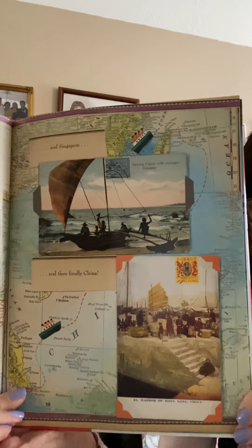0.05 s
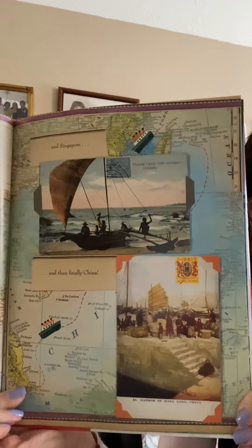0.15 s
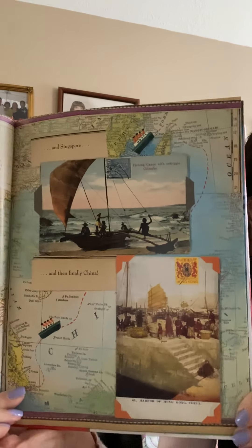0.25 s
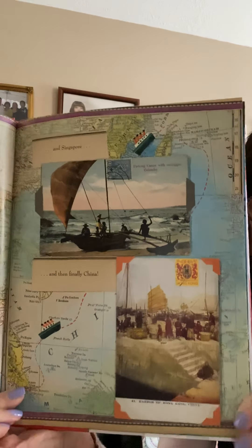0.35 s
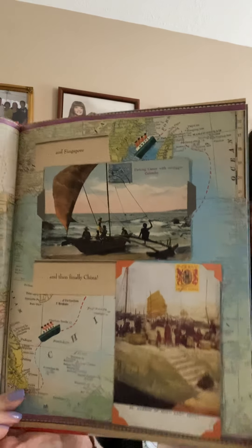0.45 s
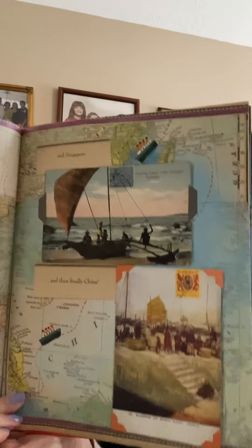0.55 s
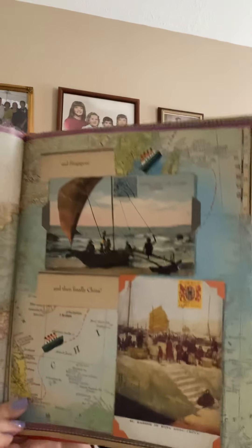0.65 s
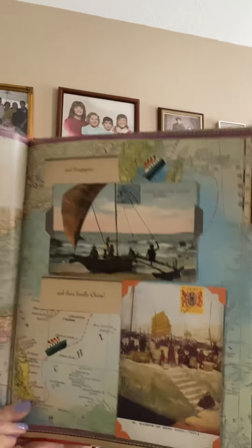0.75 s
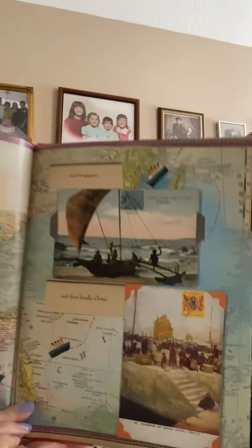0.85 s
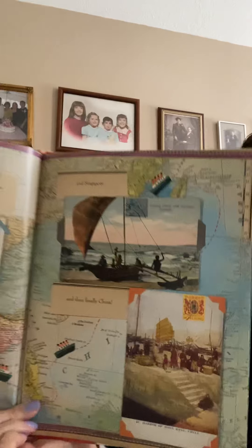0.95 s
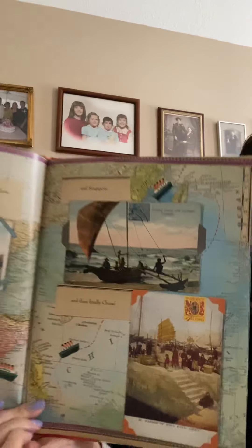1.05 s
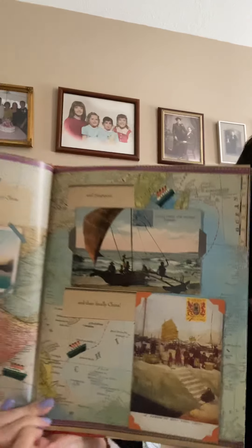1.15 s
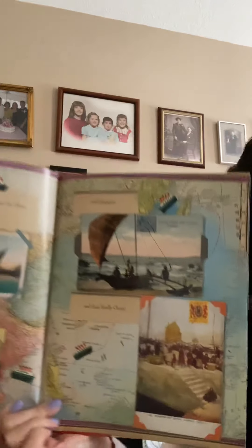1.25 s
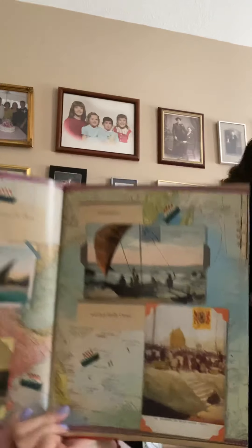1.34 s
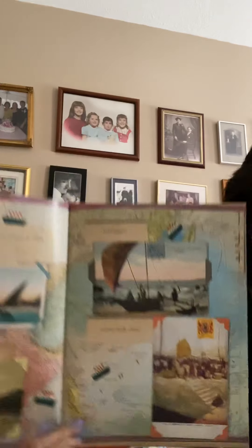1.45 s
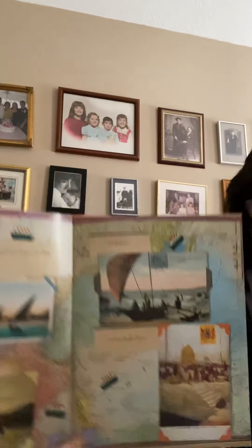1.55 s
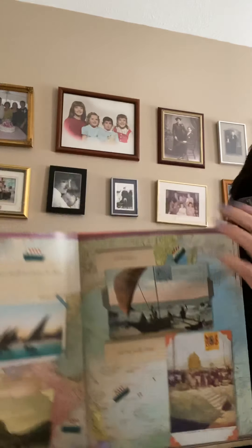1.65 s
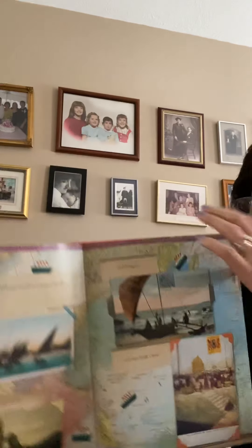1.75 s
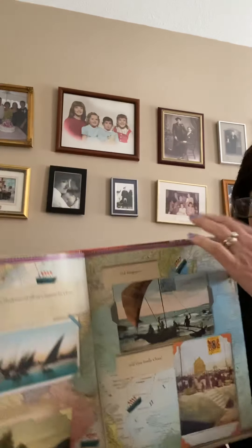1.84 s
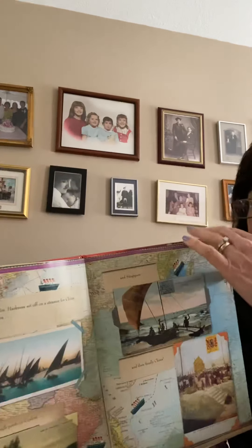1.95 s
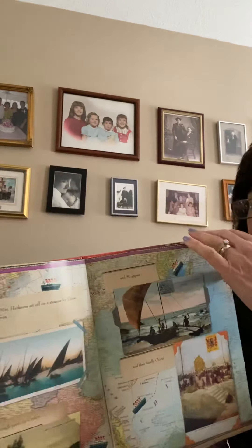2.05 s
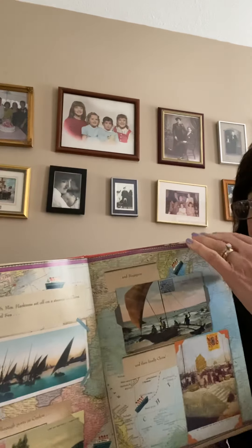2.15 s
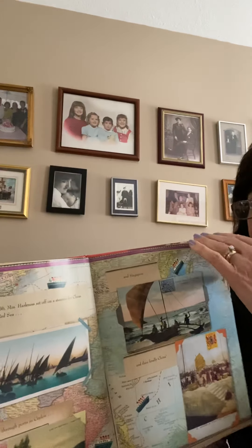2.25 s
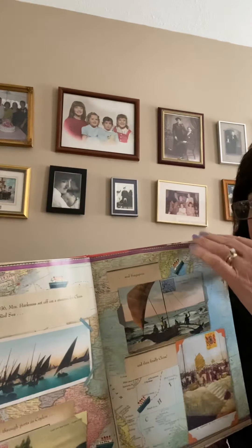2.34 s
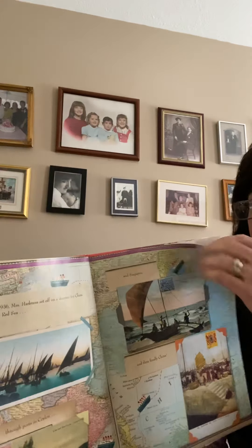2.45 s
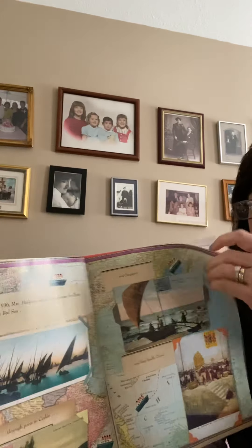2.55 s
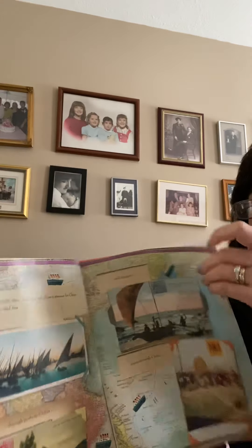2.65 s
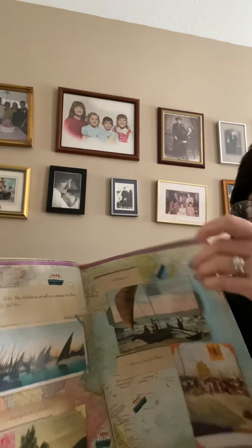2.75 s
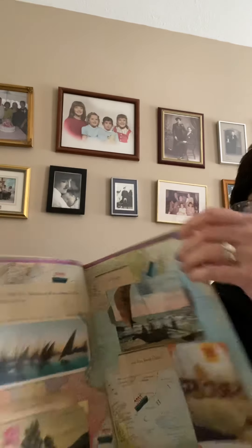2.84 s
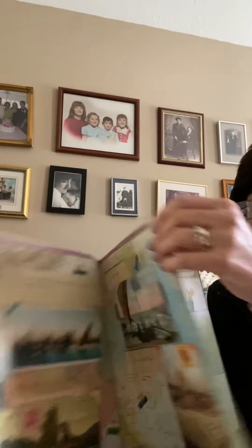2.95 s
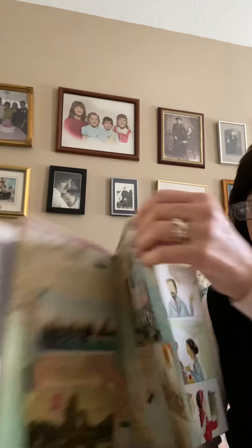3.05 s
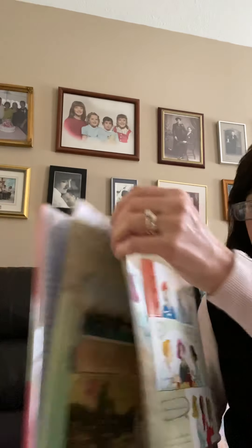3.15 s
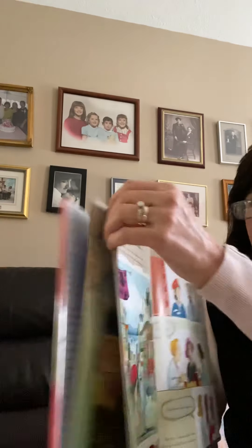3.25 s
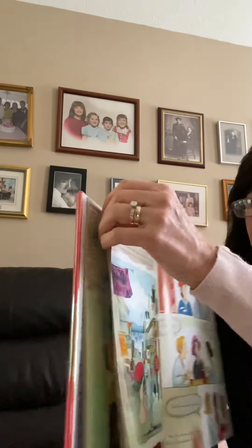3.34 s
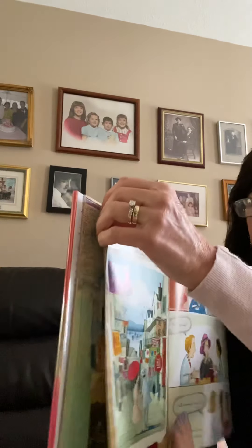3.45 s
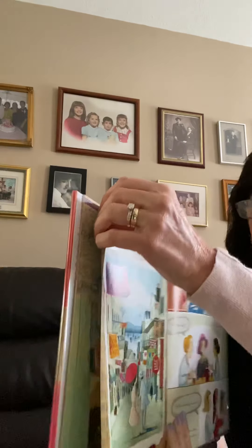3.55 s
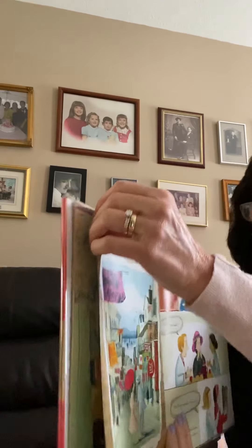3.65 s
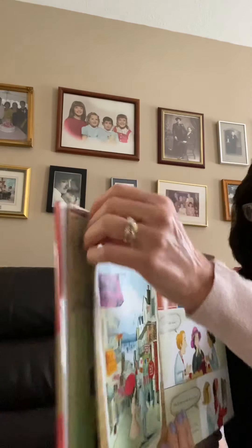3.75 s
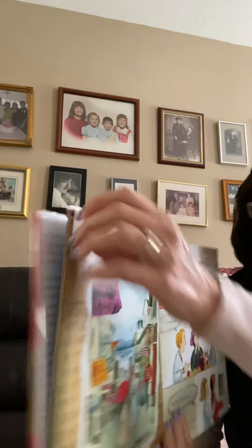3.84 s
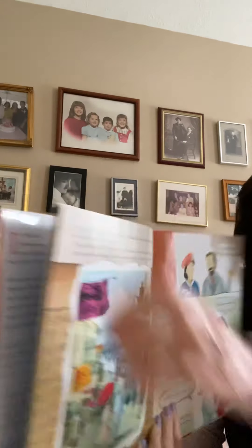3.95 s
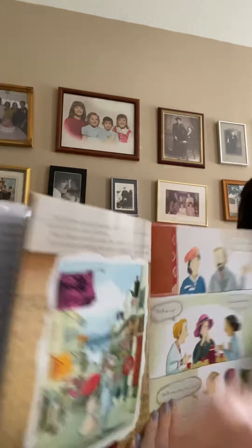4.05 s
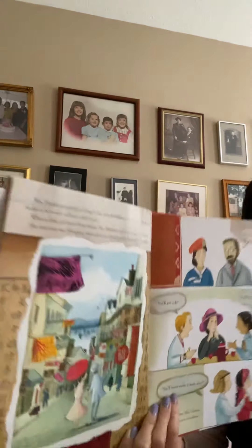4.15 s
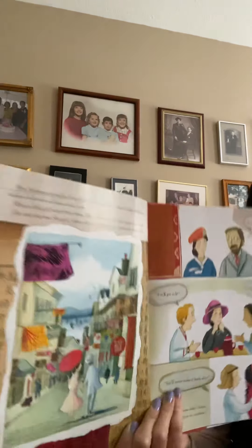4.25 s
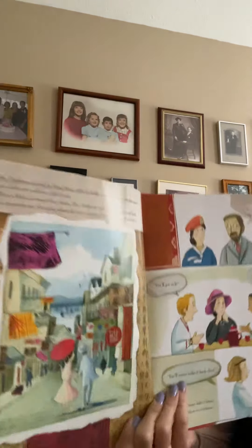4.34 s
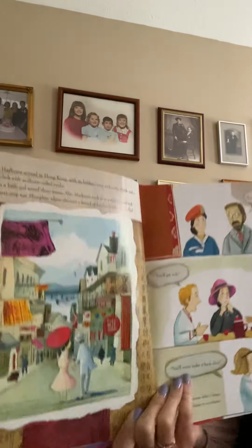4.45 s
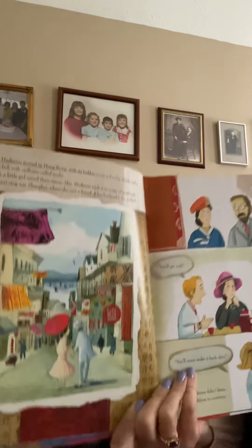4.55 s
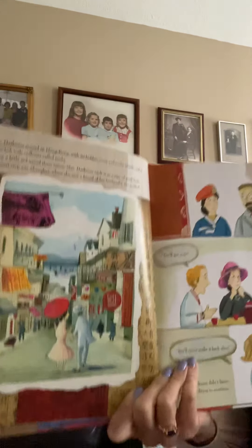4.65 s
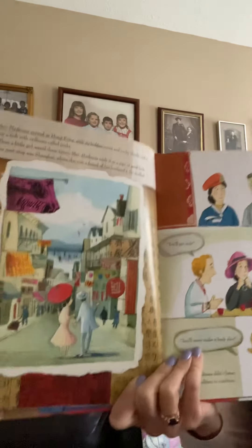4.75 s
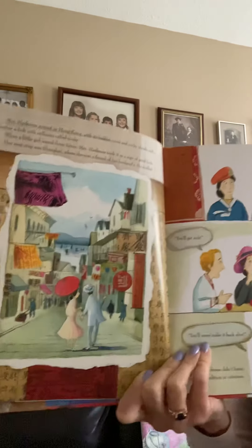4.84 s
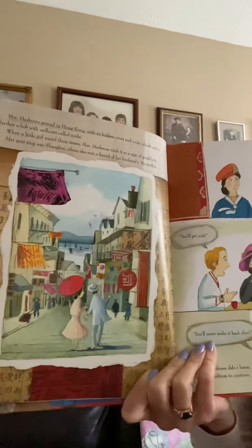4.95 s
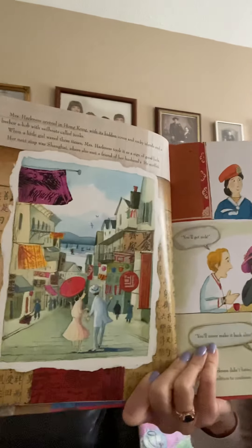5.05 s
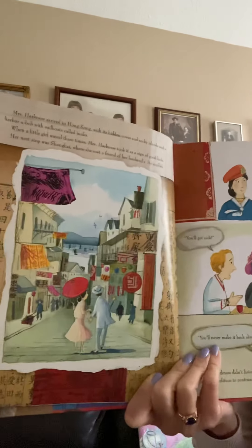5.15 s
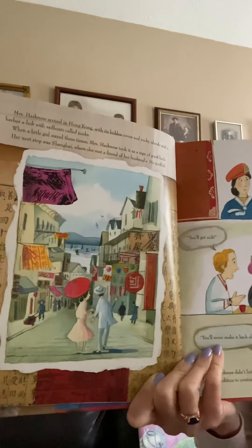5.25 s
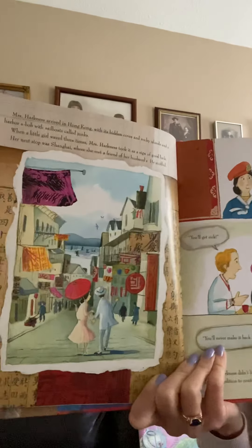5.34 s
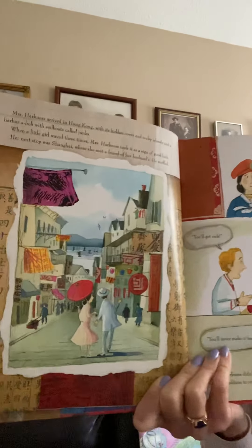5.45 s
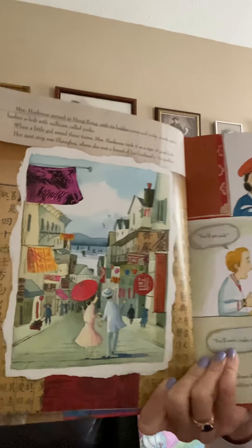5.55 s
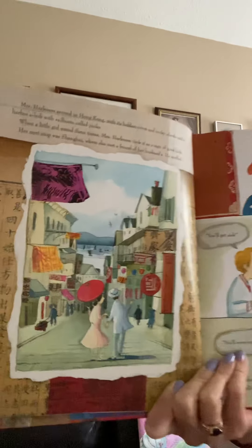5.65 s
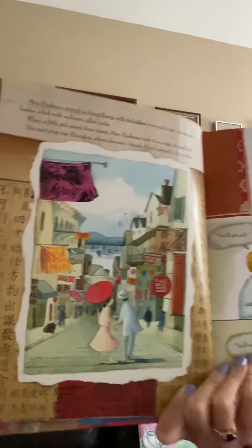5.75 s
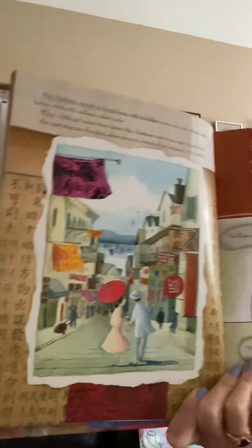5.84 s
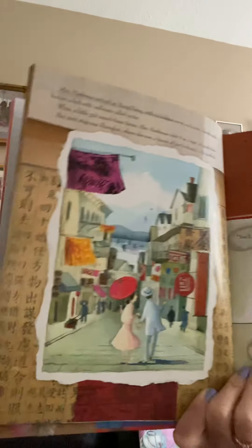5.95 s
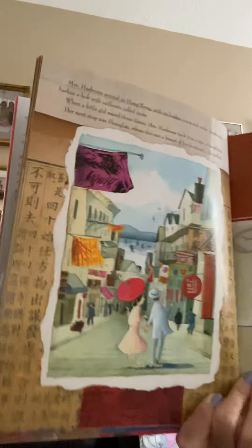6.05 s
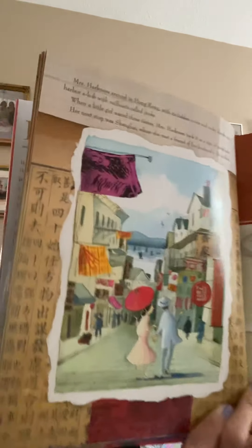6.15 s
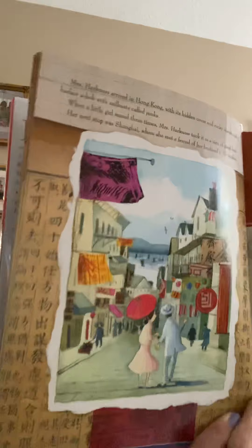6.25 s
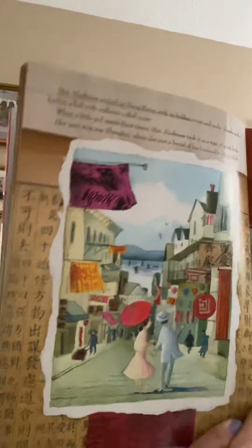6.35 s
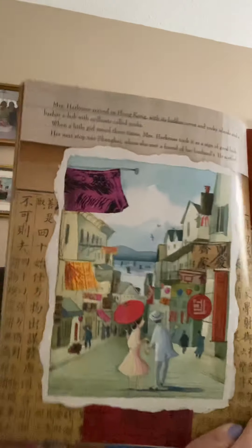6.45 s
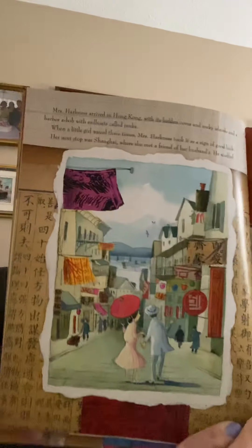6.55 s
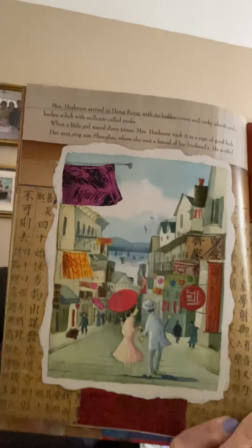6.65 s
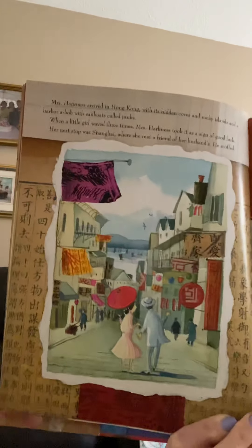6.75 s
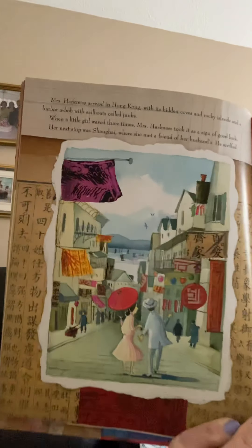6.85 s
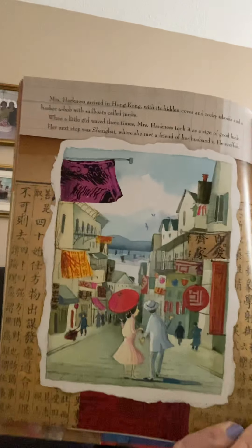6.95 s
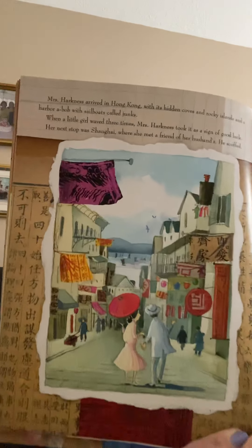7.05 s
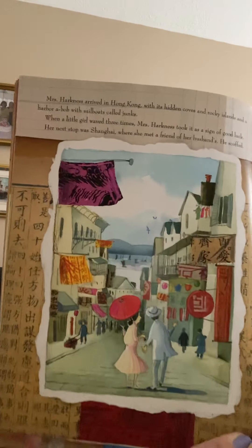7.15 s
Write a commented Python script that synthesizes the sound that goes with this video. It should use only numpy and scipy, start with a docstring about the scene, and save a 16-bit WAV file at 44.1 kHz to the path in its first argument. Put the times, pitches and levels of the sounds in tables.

```python
"""The stiff page of a large picture book buckles, flaps over and is smoothed down, close to a microphone.
Each buckle or flap is a dying run of noise slips exciting the chirped ring of a bending sheet.
Fingers tap the cover (damped modes) and slide over paper (shaped noise with ticks); later the grip
rustles softly. A low noise rumble and a faint hum fill the quiet living room."""
import sys
import numpy as np
from scipy import signal
from scipy.fft import rfft, irfft
from scipy.io import wavfile
from scipy.ndimage import uniform_filter1d

SR = 44100
rng = np.random.default_rng(int(sys.argv[2]) if len(sys.argv) > 2 else 0)


def store_pcm(level_fs):
    """Save levels as 16-bit WAV."""
    pcm = np.round(np.clip(level_fs, -1, 1) * 32767).astype(np.int16)
    wavfile.write(sys.argv[1], SR, np.atleast_2d(pcm).T)


N = 317994
TIME = np.arange(N) / SR  # [s]


def amp(db):
    """Level definition: converts decibels to a linear gain."""
    return 10 ** (np.asarray(db) / 20)


def unit(x):
    """Normalisation: scales a signal to an rms of one."""
    return x / np.sqrt(np.mean(x ** 2) + 1e-20)


def read(points, hz):
    """Logarithmic frequency scale: interpolates a tabulated curve along it."""
    f, value = np.transpose(points)
    return np.interp(np.log(hz + 1), np.log(f + 1), value)


def add(mix, start_s, sound):
    """Superposition: adds a sound into the mix, in place, from its start time."""
    start = max(round(start_s * SR), 0)
    part = mix[..., start:][..., :sound.shape[-1]]
    part += sound[..., :part.shape[-1]]


def colour(x, spectrum):
    """Linear filtering: weights a full-length signal by a spectrum, at an rms of one."""
    gain = amp(read(spectrum, np.fft.rfftfreq(N, 1 / SR)))
    return unit(irfft(rfft(x) * gain, N))


def pair(x, likeness):
    """Interchannel coherence: blends two unrelated signals into a partly alike left and right."""
    a, b = rfft(x)
    same = np.clip(read(likeness, np.fft.rfftfreq(x.shape[-1], 1 / SR)), -1, 1)
    mid = a * np.sqrt((1 + same) / 2)
    side = b * np.sqrt((1 - same) / 2)
    return irfft(np.array([mid + side, mid - side]), x.shape[-1])


def wander(rate_hz):
    """Slow random modulation: Gaussian-lowpassed noise at an rms of one."""
    hz = np.fft.rfftfreq(N, 1 / SR)
    return unit(irfft(rfft(rng.standard_normal(N)) * np.exp(-(hz / rate_hz) ** 2), N))


# left-right likeness of paper sounds: (frequency [Hz], coherence [share])
PAPER_LIKENESS = [(100, 1), (600, 0.44), (1400, 0.38), (3000, 0.037), (7000, 0.79), (15000, 0.79)]


def band(hz, width_hz, length):
    """Amplitude modulation: slow noise carried on a centre frequency makes one soft-edged band."""
    offset = np.fft.fftfreq(length, 1 / SR)
    noise = rng.standard_normal((2, length))
    slow = np.fft.ifft(np.fft.fft(noise) / (1 + abs(2 * offset / width_hz) ** 3))
    carrier = np.exp(2j * np.pi * np.cumsum(hz * np.ones(length)) / SR)
    return unit(pair((slow * carrier).real, PAPER_LIKENESS))


# general colour of ringing paper: (frequency [Hz], level [dB])
PAPER_SPECTRUM = [(60, -9), (200, 2.5), (400, 3.5), (1000, -1.5), (3000, 6.5), (7000, 3.5), (10500, -1.5),
                  (13000, 3), (16000, -10)]


def sheet(pitch_hz, fall, bass_slope=2.5, bump_db=6.0, bump_octaves=0.18, lag=.0007, size=2048):
    """Dispersion: bending waves travel slower at low pitch, so a patch of paper rings with a falling chirp.
    The slopes are in dB per octave; lag is the dispersive delay at 1 kHz [s]."""
    hz = np.fft.rfftfreq(size, 1 / SR)
    octaves = np.log2((hz + 1) / pitch_hz)
    db = bass_slope * np.minimum(octaves, 0) - fall * np.maximum(octaves, 0)
    db = db + bump_db * np.exp(-(octaves / bump_octaves) ** 2) + read(PAPER_SPECTRUM, hz)
    log_gain = np.log(amp(np.r_[db, db[-2:0:-1]]))
    # minimum phase from the Hilbert transform, then a delay growing as 1 / sqrt(frequency)
    minimum_phase = signal.hilbert(log_gain).conj()[:len(hz)]
    turns = 2 * lag * np.sqrt(1000 * hz)
    return irfft(np.exp(minimum_phase - 2j * np.pi * turns), size)[:size // 2]


def burst(db, ring, rise, t60, likeness=PAPER_LIKENESS, grain_db=1.5, grain_s=0.0014):
    """Source-filter principle: a dying run of uneven slips rings the paper.
    The total energy is that of 5 ms at level db."""
    t = TIME[:SR // 6]
    envelope = (1 - np.exp(-t / rise)) * 1000 ** (-t / t60)
    clumps = unit(uniform_filter1d(rng.standard_normal(len(t)), max(round(grain_s * SR), 1)))
    slips = rng.standard_normal((2, len(t))) * envelope * amp(grain_db * clumps)
    sound = signal.fftconvolve(pair(slips, likeness), ring[None], axes=1)
    return amp(db) * unit(sound) * np.sqrt(.005 * SR / sound.shape[1])


def blow(modes, stretch, contact, damping=1):
    """Modal superposition: a soft blow on damped modes, peaking at one; contact [s] rounds the onset."""
    t = TIME[:SR // 10]
    ring = np.zeros(len(t))
    for hz, db, t60 in modes:
        ring += amp(db) * 1000 ** (-t * damping / t60) * np.sin(2 * np.pi * hz * stretch * t)
    ring = ring * (1 - np.exp(-(t / contact) ** 2))
    return ring / abs(ring).max()


# colour of the rumble: (frequency [Hz], relative level [dB])
RUMBLE_SPECTRUM = [(12,-24), (25,-14.5), (36,-4), (45,-2.5), (56,2), (68,-10.5), (85,-4.5), (120,-13),
                   (160,-16.5), (230,-15), (440,-25.5), (530,-32.5), (900,-43), (1700,-43.5), (16000,-61.5)]
# left-right likeness of the rumble: (frequency [Hz], coherence [share])
RUMBLE_LIKENESS = [(60, 1), (130, 0.96), (290, 0.7), (640, 0), (1400, 0), (7000, 0.24), (15000, .3)]
# faint steady tones of household machines: (frequency [Hz], level [dB])
MACHINE_TONES = [(268, -78.5), (441, -76.5)]
RUMBLE_DB = -53.5
HUM_HZ, HUM_DB = 120.3, -59.5  # the level is the centre of its wavering


def background():
    """Broadband and tonal noise: a low rumble of the house, a wavering mains hum and machine tones."""
    noise = pair(rng.standard_normal((2, N)), RUMBLE_LIKENESS)
    rumble = amp(RUMBLE_DB) * colour(noise, RUMBLE_SPECTRUM)
    hum = np.sqrt(2) * np.sin(2 * np.pi * HUM_HZ * TIME + .35 * wander(rate_hz=3.2))
    hum = hum * amp(HUM_DB + 1.8 * wander(rate_hz=4.7))
    tones = np.zeros(N)
    for hz, db in MACHINE_TONES:
        tones += amp(db) * np.sqrt(2) * np.sin(2 * np.pi * hz * TIME + 0.34 * wander(rate_hz=0.6))
    return rumble + hum + tones


# one puff of air: (time of the peak [s], level [dB], centre [Hz], time from peak to 1/e [s])
AIR_PUFF = (2.95, -55, 88, .3)


def waft():
    """Air displacement: the swinging page fans a low puff, a narrow noise band under a bell curve."""
    s, db, hz, length = AIR_PUFF
    return amp(db) * np.exp(-((TIME - s) / length) ** 2) * band(hz, 0.12 * hz, N)


# fingertips on the cover: (time [s], peak of the board's ring [dB], tick of the paper [dB],
# pitch ratio at that spot [1], damping ratio [1])
FINGER_TAPS = [(0.5365, -35.5, -63, 0.98, 1.1), (0.809, -54, -76, .9, 1.9),
               (0.8763, -35.5, -56, 0.96, 0.79), (4.1325, -41, -41, 0.6, 1.3),
               (4.19, -39.5, -43, 1.01, 0.91), (4.282, -37.5, -48, 0.9, 1.3),
               (4.4621, -34, -45.5, 1.07, 1.4), (4.855, -48.5, -61, 0.93, 0.8),
               (4.941, -72.5, -62.5, 1.09, 1.6), (5.462, -37.5, -45, 0.92, 1.4),
               (7.179, -49, -68, 0.94, 2.4), (7.183, -47, -68, 1.01, 1.9)]
# cover board modes, before a tap's ratios: (frequency [Hz], level [dB], t60 [s])
COVER_MODES = [(475, -14.5, 0.01), (929, 0.5, 0.021), (1286, -2.5, 0.015), (2080, -1, 0.01),
               (3610, -17.5, 0.0092), (5060, -19, 0.005)]


def cover_taps():
    """Modal excitation: fingertips ring the board; a finger that stays down damps it further."""
    out = np.zeros(N)
    for s, db, _, stretch, damping in FINGER_TAPS:
        add(out, s, amp(db) * blow(COVER_MODES, stretch, contact=0.00038, damping=damping))
    return np.array([out, out])


def finger_ticks():
    """Impact excitation: each fingertip also ticks against the paper where it lands."""
    out = np.zeros((2, N))
    ring = sheet(pitch_hz=980, fall=7.0)
    for s, _, db, *_ in FINGER_TAPS:
        add(out, s, burst(db, ring, rise=0.00051, t60=0.014))
    return out


# dull knocks of the book as the page is lifted: (time [s], peak level [dB])
BOOK_KNOCKS = [(2.565, -15.5), (2.5695, -31), (2.574, -39)]
# modes of the bound block of pages, before its pitch ratio: (frequency [Hz], level [dB], t60 [s])
BLOCK_MODES = [(502.6, -7.5, 0.0039), (690, 5, 0.0045), (1800, -17.5, 0.0014)]


def block_knocks():
    """Modal excitation: the heavily damped block of pages knocks and settles."""
    out = np.zeros(N)
    for s, db in BOOK_KNOCKS:
        add(out, s, amp(db) * blow(BLOCK_MODES, stretch=0.94, contact=0.0022))
    return np.array([out, out])


def edge_scuffs():
    """Impact excitation: the page edges scuff dryly, 1 ms ahead of each knock."""
    out = np.zeros((2, N))
    edge = sheet(pitch_hz=1750, fall=13.0)
    for s, db in BOOK_KNOCKS:
        add(out, s - .001, burst(db - 25, edge, rise=.0006, t60=0.013))
    return out


# two long, faint slides, the page over the hand and the book through the grip:
# (time [s], rub level [dB], hiss level [dB])
PAGE_SLIDE = [(2.55, -56.5, -68), (2.672, -57.5, -61.5), (2.92, -56, -66), (3.086, -52.5, -72),
              (3.396, -62, -59.5), (3.522, -52, -52.5), (3.66, -67.5, -82)]
GRIP_SLIDE = [(5.62, -75.5, -84), (5.69, -61.5, -70), (5.756, -73, -74), (5.882, -60, -71),
              (5.974, -59.5, -68), (6.14, -60, -70), (6.22, -76, -80)]
# single strokes of a hand over the paper:
# (time of the peak [s], rub level [dB], hiss level [dB], length [s])
HAND_STROKES = [(0.304, -62.5, -72, 0.13), (0.652, -59, -70, 0.067), (1.382, -75, -82, 0.099),
                (1.735, -65.5, -65.5, 0.049), (2.033, -59.5, -60, 0.13), (2.081, -65, -56.5, 0.027),
                (2.182, -63.5, -75.5, 0.078), (2.28, -56.5, -52, 0.045), (2.427, -55, -53, 0.34),
                (2.5, -46, -41.5, 0.073), (2.649, -46.5, -48.5, 0.1), (3.014, -65, -50, 0.15),
                (3.204, -38, -46, 0.1), (3.359, -53.5, -55.5, 0.14), (3.46, -46.5, -60, 0.095),
                (3.765, -53, -48, 0.21), (3.872, -57.5, -59, 0.28), (4.096, -62.5, -77.5, 0.6),
                (4.493, -68.5, -64.5, 0.14), (4.77, -103, -78.5, 0.99), (5.495, -61, -66, 0.19),
                (5.801, -50.5, -53, 0.17), (5.889, -51.5, -50.5, 0.17), (6.06, -81, -62, 0.21),
                (6.297, -62, -79.5, 0.52), (6.397, -73, -71, 0.038), (6.548, -64, -77, 0.31),
                (6.675, -71.5, -85, 0.13), (6.756, -69.5, -80, 0.32), (7.184, -67, -80, 0.058)]
# a stroke swells for this share of its length; its ends lie this far [dB] under the peak
SWELL_SHARE, STROKE_DROP_DB, STROKE_ROUNDNESS = 0.41, 20.5, 1.48


def motion():
    """Energy addition: sums slide and stroke powers into rub and hiss levels [dB]."""
    power = np.zeros((2, N))
    for slide in (PAGE_SLIDE, GRIP_SLIDE):
        s, *levels = np.transpose(slide)
        power += amp([np.interp(TIME, s, db, left=-120, right=-120) for db in levels]) ** 2
    t = TIME[:SR] - .5
    for s, rub_db, hiss_db, length in HAND_STROKES:
        away = abs(t) / (length * np.where(t < 0, SWELL_SHARE, 1 - SWELL_SHARE))
        peak_db = np.array([[rub_db], [hiss_db]])
        stroke = amp(peak_db - STROKE_DROP_DB * away ** STROKE_ROUNDNESS) ** 2
        add(power, s + t[0], stroke[:, s + t >= 0])
    return 10 * np.log10(power)


def patches(x, depth_db, span_frames=9, span_bins=3):
    """Time-varying resonance: as the sheet bends, its resonances come and go in shifting patches."""
    z = signal.stft(x, SR, nperseg=512, noverlap=384)[2]
    field = rng.standard_normal(z.shape[1:])
    field = uniform_filter1d(field, span_bins, 0)
    field = unit(uniform_filter1d(field, span_frames, 1))
    return unit(signal.istft(z * amp(depth_db * field), SR, nperseg=512, noverlap=384)[1][:, :N])


def friction(level_db, spectrum, catches_per_s, spread_db, catch_share, judder, patchy_db):
    """Stick-slip friction: fibres rub in a fine wash; now and then one catches and lets go with a tick."""
    sizes = amp(spread_db * np.minimum(rng.exponential(1, N), 4))
    catches = unit(sizes * rng.choice([-1, 1], N) * (rng.random(N) < catches_per_s / SR))
    wash = pair(rng.standard_normal((2, N)), PAPER_LIKENESS)
    grain = colour(np.sqrt(1 - catch_share) * wash + np.sqrt(catch_share) * catches, spectrum)
    return patches(grain, patchy_db) * amp(level_db + judder)


# colours of the dull rub and the bright hiss: (frequency [Hz], relative level [dB])
RUB_SPECTRUM = [(80, -2), (250, 1.5), (500, -3), (900, 4), (1500, -3), (2300, -2.5), (3000, -8.5),
                (4200, -15.5), (8000, -39.5)]
HISS_SPECTRUM = [(1200, -23.5), (2400, 0.5), (3200, 0.5), (4500, -3), (5600, -3), (7200, -4), (9500, -13.5),
                 (11500, -6), (13000, -15.5), (16000, -20)]


def sliding(rub_db, hiss_db):
    """Common modulation: uneven pressure of the hand drives a dull rub and a bright hiss together."""
    pressure = np.tanh(wander(rate_hz=28))
    rub = friction(rub_db, RUB_SPECTRUM, catches_per_s=160, spread_db=5.5, catch_share=0.044,
                   judder=5.0 * pressure, patchy_db=3)
    hiss = friction(hiss_db, HISS_SPECTRUM, catches_per_s=1100, spread_db=3.5, catch_share=.4,
                    judder=2.0 * pressure, patchy_db=2.5)
    return rub + hiss


# a fingertip skims the paper, which sings in one band: (time of the peak [s], level [dB],
# centre [Hz], width [share of centre], length [s], glide per length [octaves])
FINGER_BRUSHES = [(0.351, -73.5, 2390, .7, .06, -.08), (0.681, -67.5, 2150, 0.89, 0.16, -.22),
                  (1.622, -70, 1916, 0.85, 0.14, -.08), (2.034, -55, 7480, 0.84, 0.035, 0),
                  (2.079, -56.5, 7530, 0.52, .022, 0), (2.287, -49.5, 3415, 0.56, 0.048, -0.2),
                  (2.383, -50.5, 5500, 0.64, 0.061, 0), (2.434, -48, 4700, 0.64, 0.12, 0),
                  (2.465, -46, 4400, 0.8, 0.014, 0), (2.437, -52.5, 2350, 0.23, 0.12, 0),
                  (3.27, -45.5, 2500, 0.66, .055, -0.13), (3.428, -52, 6800, 0.74, 0.16, -0.02),
                  (3.928, -54.5, 2600, 0.96, 0.035, -.1), (4.47, -59.5, 2955, 0.33, 0.064, 0),
                  (4.759, -73.5, 4390, 0.2, 0.35, -0.11), (5.147, -81, 4250, 0.3, 0.064, -0.043),
                  (5.554, -68, 2810, 0.2, 0.129, .04), (6.322, -62, 881, 0.55, 0.17, 0.012),
                  (6.535, -75, 6410, 0.68, 0.13, -0.011), (6.661, -79, 6300, 0.46, 0.087, 0.02),
                  (6.749, -53.5, 2673, 0.39, 0.044, -.15)]
BRUSH_SWELL_SHARE, BRUSH_FLUTTER_DB = 0.36, 2.8  # swelling share of the length; rms level flutter


def brushes():
    """Band-limited friction noise: skimming fingers give swishes that swell and fade."""
    out = np.zeros((2, N))
    t = TIME[:SR // 2] - .25
    for s, db, hz, width, length, glide in FINGER_BRUSHES:
        span = length * np.where(t < 0, BRUSH_SWELL_SHARE, 1 - BRUSH_SWELL_SHARE)
        envelope = np.exp(-(t / span) ** 2)
        centre_hz = hz * 2 ** (glide * np.clip(t / length, -1, 1))
        add(out, s + t[0], amp(db) * envelope * band(centre_hz, width * hz, len(t)))
    return out * amp(BRUSH_FLUTTER_DB * wander(rate_hz=56))


# a dragging fingertip squeaks:
# (time of the peak [s], level [dB], centre [Hz], glide per length [octaves], length [s])
FINGER_SQUEAKS = [(5.495, -56, 1850, -0.062, 0.0098), (5.517, -53, 1360, -0.25, 0.028),
                  (5.52, -58.5, 2700, -0.081, 0.032)]


def squeaks():
    """Stick-slip tone: a slowing fingertip squeaks on the glossy page, a narrow band sinking in pitch."""
    out = np.zeros((2, N))
    t = TIME[:SR // 4] - .125
    for s, db, hz, glide, length in FINGER_SQUEAKS:
        centre_hz = hz * 2 ** (glide * np.clip(t / length, -1, 1))
        envelope = np.exp(-(2 * t / length) ** 2)
        add(out, s + t[0], amp(db) * envelope * band(centre_hz, 110, len(t)))
    return out


# most creases per second, their level against the rub [dB], the spread of their sizes [dB]
CRINKLES_PER_S, CRINKLE_DB, CRINKLE_SPREAD_DB = 130, -3, 3.5


def crinkles(rub_db, busiest_db=-55, thinning=.5):
    """Random point process: tiny creases give way louder, and up to a limit more often, with harder rubbing."""
    sizes = unit(amp(CRINKLE_SPREAD_DB * np.minimum(rng.exponential(1, N), 3)))
    rate = CRINKLES_PER_S * amp(thinning * np.minimum(rub_db - busiest_db, 0))
    clicks = sizes * rng.choice([-1, 1], N) * (rng.random(N) < rate / SR)
    kind, out = rng.integers(0, 3, N), np.zeros((2, N))
    for k, hz in enumerate([1400, 2000, 2800]):
        crack = burst(0, sheet(pitch_hz=hz, fall=14.0), rise=0.00016, t60=0.0018)
        out += signal.oaconvolve((clicks * (kind == k))[None], crack, axes=1)[:, :N]
    return out / np.sqrt(CRINKLES_PER_S * .005) * amp(rub_db + CRINKLE_DB)


# the loudest creases and page edges snapping:
# (time [s], level [dB], pitch [Hz], treble fall [dB per octave], t60 [s])
CREASE_SNAPS = [(0.272, -50, 1670, 6.5, 0.017), (0.295, -45.5, 1780, 9.5, 0.015),
                (0.3067, -60, 1200, 4, 0.013), (0.325, -53.5, 800, -3.5, 0.0071),
                (.349, -58, 2250, 16, 0.011), (0.6305, -52, 1960, 23, 0.008),
                (0.6495, -44, 2200, 34, 0.007), (0.659, -56, 2200, 24, 0.008),
                (1.276, -60.5, 960, 11.5, .04), (2.44, -38, 556, 5.5, 0.026), (2.465, -40, 1250, 2, 0.031),
                (2.475, -39.5, 796, 7, 0.016), (2.6212, -40, 1160, 8.5, 0.012),
                (2.644, -35.5, 1490, 8, 0.0089), (2.6475, -34, 1400, 5.5, 0.007),
                (2.6555, -48, 2660, 10, 0.0058), (2.719, -48, 1200, 9.5, 0.014),
                (2.768, -49.5, 1200, 10.5, 0.009), (2.805, -49, 1200, 9, 0.0096),
                (2.8418, -36.5, 920, 7.5, 0.02), (3.084, -38, 1900, 16, 0.0092),
                (3.1785, -36, 930, 8, 0.018), (3.1927, -38, 1300, 16, 0.012), (3.198, -37, 800, 9.5, 0.01),
                (3.2023, -35.5, 840, 7, 0.0068), (3.2108, -39.5, 1000, 6.5, 0.007),
                (3.216, -47, 1000, 7, 0.0081), (3.2282, -35.5, 1010, 12, 0.017),
                (3.2363, -25.5, 1940, 14, 0.01), (3.24, -29, 840, 7.5, 0.0072),
                (3.2469, -40.5, 810, 13, 0.0072), (3.2597, -51, 694, 14, .007),
                (3.311, -46, 1200, 7, 0.0038), (3.36, -52, 2500, 6, 0.008), (3.437, -51, 2500, 1, .008),
                (3.467, -37, 780, -8, 0.0075), (3.477, -40, 900, -6, .009), (3.548, -36, 710, 5, 0.0097),
                (3.597, -56, 2400, -1, 0.0096), (3.607, -53.5, 3500, 4, .006), (3.6919, -46, 920, 1, 0.03),
                (3.722, -53, 2500, 10, .008), (3.748, -44.5, 2200, 10, 0.0071),
                (3.7673, -40.5, 900, 1, 0.008), (3.775, -37, 2180, -10, 0.016),
                (3.817, -40.5, 1470, -0.5, 0.013), (3.8524, -38.5, 2200, 1.5, 0.046),
                (4.0602, -49.5, 1740, 9.5, 0.009), (4.087, -49.5, 1900, 11, 0.01),
                (4.1, -48, 980, 7, 0.0093), (4.4166, -55, 750, 8.5, 0.014), (4.426, -55, 930, 12, 0.014),
                (4.438, -51.5, 800, 20, 0.0082), (4.4542, -58, 2700, 29, 0.0068),
                (4.4636, -48, 990, 6.5, 0.013), (4.4715, -49, 3280, 16, 0.0061),
                (4.4833, -62, 2900, 21, .006), (4.486, -64, 1300, 9, 0.0045), (4.495, -61, 2800, 9, .006),
                (4.505, -67, 2600, 14, 0.0065), (4.524, -60.5, 1000, 12, .009),
                (4.599, -60.5, 2500, 4.5, 0.0062), (4.951, -56, 590, 12.5, 0.021),
                (5.4689, -44.5, 1150, -3, 0.021), (5.5303, -46, 900, 5.5, 0.006),
                (5.6504, -55, 610, 4, 0.017), (5.6679, -46, 683, 7, 0.022), (5.747, -52, 1580, 28, 0.018),
                (5.762, -43, 1490, 18, 0.027), (5.7917, -49, 1800, 1, .005), (5.795, -38, 1610, 3, 0.0085),
                (5.8058, -43, 1620, 5, 0.013), (5.811, -40.5, 2020, 13, 0.0084),
                (5.822, -51, 2000, 3, 0.0045), (5.831, -59, 1500, 14, 0.0039),
                (5.8495, -44.5, 1570, 11, 0.0082), (5.8697, -36, 740, -12, 0.0074),
                (5.8702, -47.5, 1490, 7, 0.0053), (5.88, -49, 1000, -2, .005),
                (5.888, -37.5, 1420, 8, 0.01), (5.8996, -44, 2300, 14, 0.0057),
                (5.923, -50, 2500, -1, 0.0089), (6.027, -40, 2130, 7, 0.01), (6.0369, -45.5, 1200, 3, 0.01),
                (6.067, -55, 2420, 4, 0.013), (6.1136, -56, 900, 1, 0.011), (6.1628, -52, 1560, 15, 0.008),
                (6.248, -60, 890, 12, 0.0077), (6.278, -58, 1000, 13, 0.0061),
                (6.333, -58, 1700, 18, 0.011), (6.392, -55, 2100, 14.5, 0.027),
                (6.487, -57, 1000, 13, 0.017), (6.56, -59.5, 1495, 16, .009),
                (6.7355, -42.5, 2210, 17.5, 0.017)]


def snaps(rise_share=0.19):
    """Buckling instability: small patches of paper crack briefly; longer cracks build more slowly."""
    out = np.zeros((2, N))
    for s, db, pitch_hz, fall, t60 in CREASE_SNAPS:
        add(out, s, burst(db, sheet(pitch_hz, fall), rise=rise_share * t60, t60=t60))
    return out


# the whole sheet buckling and flapping: (time [s], level [dB], pitch [Hz],
# treble fall [dB per octave], t60 [s], left minus right [dB], bending-wave lag at 1 kHz [s])
PAGE_FLAPS = [(2.8507, -19, 1260, 11.5, 0.019, 0, 0.0018), (2.858, -23.5, 990, 19.5, 0.073, 3.5, .002),
              (2.871, -30, 1005, 12.5, 0.12, -0.5, .002), (3.005, -33.5, 796, 25, 0.51, -1, 0.0019),
              (3.0405, -31.5, 1050, 27.5, 0.053, 1.5, 0.0011), (3.061, -28.5, 754, 4.5, 0.013, 2.5, 0.0049),
              (3.068, -30, 590, 10.5, 0.042, -1, 0.00206), (3.079, -25.5, 1103, 21, 0.078, 2.5, .0025),
              (3.1, -31.5, 760, 27, 0.066, 1, 0.0018), (3.239, -34.5, 890, 12, 0.065, 9, .002)]
# the big sheet is near, so both ports hear it nearly alike: (frequency [Hz], coherence [share])
FLAP_LIKENESS = [(100, .99), (700, .97), (1400, .95), (3000, .78), (7000, .7), (15000, .9)]
# brief rings of the stiff page: (frequency [Hz], width [Hz], gain [dB])
PAGE_RINGS = [(400, 14, 2), (562, 18, -3), (1040, 60, -4), (1180, 40, -1), (1283, 40, 0), (1400, 40, -4),
              (2096, 70, -2)]


def flaps():
    """Plate bending and resonance: the full page swings, whips and shudders, mostly longer than a crease."""
    out = np.zeros((2, N))
    for s, db, pitch_hz, fall, t60, left_db, lag in PAGE_FLAPS:
        sides = amp([[left_db / 2], [-left_db / 2]])
        ring = sheet(pitch_hz, fall, bass_slope=5.5, bump_db=-0.5, lag=lag)
        add(out, s, sides * burst(db, ring, .002, t60, FLAP_LIKENESS, grain_db=0.4))
    rings = np.zeros((2, N))
    for hz, width, db in PAGE_RINGS:
        b, a = signal.iirpeak(hz, hz / width, fs=SR)
        rings += amp(db) * signal.lfilter(b, a, out)
    return out + rings


# the room's decay: (frequency [Hz], t60 [s])
ROOM_DECAY = [(200, 0.55), (700, 0.16), (2500, 0.2), (6000, 0.17), (14000, 0.11)]
# left-right likeness of the tail: (frequency [Hz], coherence [share])
ROOM_LIKENESS = [(100, 0.94), (400, 0.38), (1000, 0.22), (3000, 0.29), (15000, 0.45)]
# reflections off open pages, reader and wall, before the near factor: (delay [s], gain [1])
CLOSE_ECHOES = [(.0019, 0.093), (.0043, -0.088), (.0088, .22), (0.0117, 0.11)]


def room(x, wet_db, near=0.51):
    """Reflection and reverberation: near surfaces throw back echoes; walls and furniture add a short tail."""
    taps = pair(rng.standard_normal((2, SR // 2)), ROOM_LIKENESS) * (TIME[:SR // 2] > .005)
    hz, t, z = signal.stft(taps, SR, nperseg=256)
    tail = signal.istft(z * 1000 ** (-t / read(ROOM_DECAY, hz)[:, None]), SR, nperseg=256)[1]
    tail = tail / np.linalg.norm(tail[0])
    out = x + amp(wet_db) * signal.fftconvolve(x.mean(0)[None], tail, axes=1)[:, :N]
    for delay, gain in CLOSE_ECHOES:
        add(out, delay, near * gain * x)
    return out


# phase between the two microphone ports: (frequency [Hz], left lead [rad])
PHASE_LEAD = [(100, 0), (1300, .05), (2400, -.4), (4000, -.2), (8000, -.4), (9800, -1.3), (11000, -2.7),
              (12000, -3.05), (16000, -3.14)]
# level between the ports: (frequency [Hz], left minus right [dB])
LEVEL_BALANCE = [(150, -1.5), (400, 0.095), (800, 1), (1300, 0.7), (2500, 1.8), (8000, 0)]


def ports(x):
    """Interaural-style cues: the book stands a little left; top treble reaches the ports out of step."""
    hz = np.fft.rfftfreq(N, 1 / SR)
    half = amp(read(LEVEL_BALANCE, hz) / 2) * np.exp(1j * read(PHASE_LEAD, hz) / 2)
    return irfft(rfft(x) * np.array([half, 1 / half]), N)


def scene():
    """Superposition: page, hands, air and background add up in the room."""
    rub_db, hiss_db = motion()
    creases = snaps() + finger_ticks() + edge_scuffs() + crinkles(rub_db)
    page = room(creases, wet_db=-7.5) + room(flaps(), wet_db=-13.0, near=0.57)
    rubbing = sliding(rub_db, hiss_db) + brushes() + squeaks()
    handling = cover_taps() + block_knocks()
    hands = room(rubbing, wet_db=-11.0) + room(handling, wet_db=-13.5, near=0.1)
    return ports(page + hands) + waft() + background()


# a fixed colour of the page and the gap, with the treble falling away above 12 kHz: (frequency [Hz], gain [dB])
FIXED_COLOUR = [(300, -1.78), (600, -2.5), (900, -1.1), (1250, -3), (1720, -2.5), (2080, -1.54),
                (2350, -2.5), (3100, -1.34), (3500, -3), (4500, -0.44), (5200, -1.5), (9500, -0.5),
                (11200, -0.7), (12300, -7), (13200, -7.5), (16000, -14)]
EDGE_HZ = 16000


def record(dry):
    """Fixed colouring: the page and the gap colour the mids, the treble falls away above 12 kHz, then a steep
    band limit."""
    heard = irfft(rfft(dry) * amp(read(FIXED_COLOUR, np.fft.rfftfreq(N, 1 / SR))), N)
    lowpass = signal.firwin(511, EDGE_HZ, window=("kaiser", 9), fs=SR)
    return signal.oaconvolve(heard, lowpass[None], "same")


dry = scene()
out = record(dry)
store_pcm(out)
```